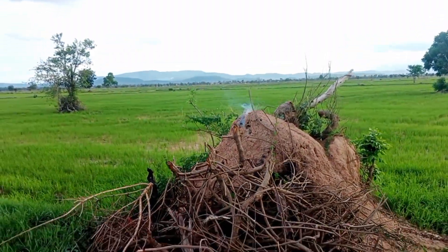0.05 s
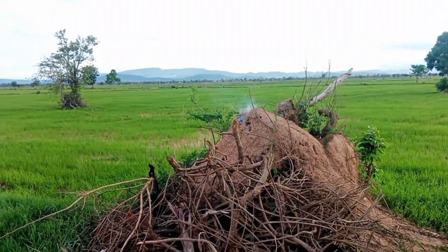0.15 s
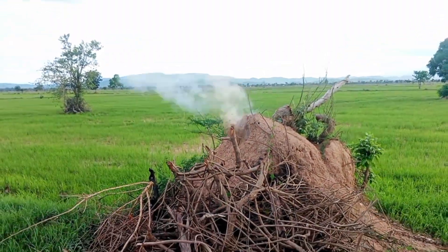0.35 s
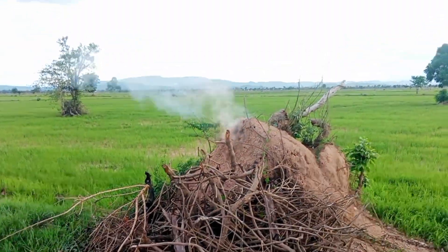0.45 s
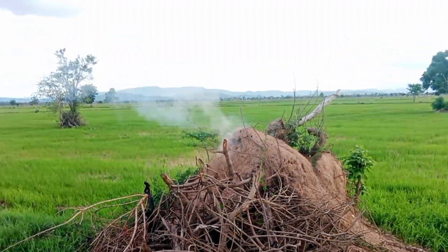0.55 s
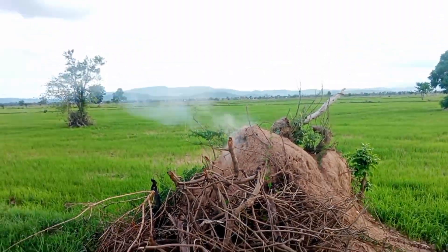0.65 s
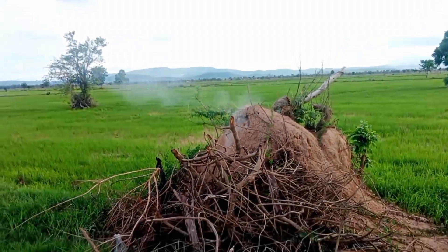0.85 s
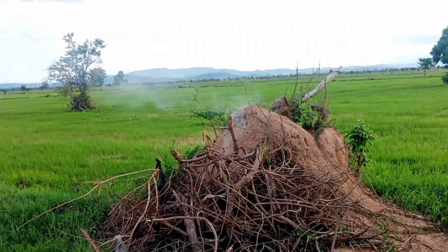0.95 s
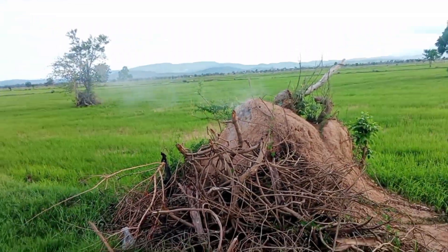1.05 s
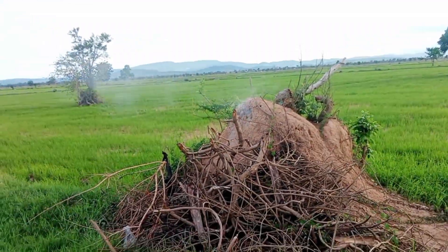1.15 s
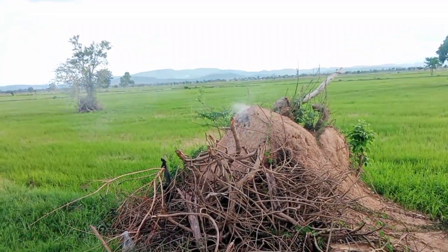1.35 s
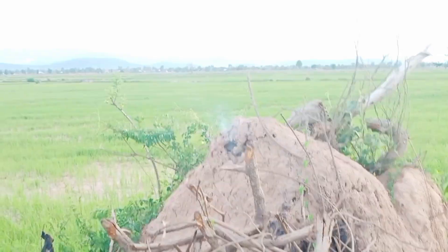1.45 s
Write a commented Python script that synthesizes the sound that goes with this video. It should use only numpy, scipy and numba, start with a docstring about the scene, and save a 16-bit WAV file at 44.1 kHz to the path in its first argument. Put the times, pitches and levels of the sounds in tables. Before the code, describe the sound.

A firecracker bangs inside an earth mound, overloading the microphone, then low echoes roll across open fields

```python
"""Open fields, an earth mound, a dull microphone: a firecracker bursts in the mound and overloads it.
The blast is a noisy ring through tanh; scattered echoes follow as a short roar of filtered random clicks.
Far low echoes roll in waves, made of band-passed noise, clicks and single bell-shaped bursts.
Soil patters as fine clicks and clods as noisy knocks, before the blast and after it; a few bright ticks.
Faint field noise and hiss lie beneath; the rumble stops short near the end."""
import sys
import numpy as np
from scipy import signal
from scipy.fft import rfft, irfft
from scipy.io import wavfile
from scipy.ndimage import uniform_filter1d
from numba import njit

SR = 44100
rng = np.random.default_rng(int(sys.argv[2]) if len(sys.argv) > 2 else 0)


def wrap_up_sound(samples):
    """Save the sound to the file named by the first command line argument, as 16-bit audio."""
    columns = np.atleast_2d(samples).T
    # keep every value between -1 and 1, then stretch to whole-number steps
    tamed = np.clip(columns, -1, 1)
    steps = np.round(tamed * 32767).astype(np.int16)
    wavfile.write(sys.argv[1], SR, steps)


def invert_db(level):
    """Linear amplitude ratio for a level in decibels (20 dB per decade), elementwise."""
    return 10 ** (np.asarray(level, dtype=float) / 20)


N = 66150
T = np.arange(N) / SR  # s
RUMBLE_STOP_S = 1.4495
DULL_HZ = 2500  # low-pass for the field noise and the fading roar


def noise():
    """White noise, rms 1."""
    return rng.standard_normal(N)


def unit(x):
    """Scales to rms 1."""
    return x / np.sqrt(np.mean(x ** 2))


def butter(order, hz, kind="low"):
    """Butterworth filter sections."""
    return signal.butter(order, hz, kind, fs=SR, output="sos")


def colour(x, table):
    """Causal minimum-phase filter with the given (f/Hz, level/dB) shape, made through the cepstrum."""
    hz, db = np.array(table).T
    grid = np.maximum(np.fft.rfftfreq(4096, 1 / SR), 1)
    log_gain = np.interp(np.log(grid), np.log(hz), db) * np.log(10) / 20
    cepstrum = irfft(log_gain)
    # fold the negative times onto the positive ones
    cepstrum[1:2048] *= 2
    cepstrum[2049:] = 0
    impulse = irfft(np.exp(rfft(cepstrum)))
    return signal.fftconvolve(x, impulse)[:len(x)]


@njit
def svf(x, hz, width):
    """State-variable band-pass whose centre moves; width is relative to the centre."""
    y, band, low = np.empty(len(x)), 0., 0.
    for i in range(len(x)):
        g = np.tan(np.pi * hz[i] / SR)
        v = (band + g * (x[i] - low)) / (1 + g * (g + width))
        band, low, y[i] = 2 * v - band, low + 2 * g * v, width * v
    return y


def curve(rows):
    """Gain from (t/s, level/dB) rows, silent outside them."""
    s, db = np.array(rows).T[:2]
    return invert_db(np.interp(T, s, db, left=-140, right=-140))


def smooth(gain):
    """Rounds the corners of a gain curve."""
    return uniform_filter1d(gain, size=200)


def gate(start, length):
    """Opens in 0.4 ms from the start, shuts in 0.6 ms after the length."""
    opening = np.clip((T - start) / 4e-4, 0, 1)
    closing = np.clip((start + length - T) / 6e-4 + 1, 0, 1)
    return opening * closing


def decay(start, t60):
    """Exponential fall from 1 at the start, 60 dB in t60 seconds."""
    return (T >= start) * invert_db(-60 * np.maximum(T - start, 0) / t60)


def walk(per_s):
    """Random levels joined by straight lines."""
    return np.interp(T * per_s, np.arange(256), rng.standard_normal(256))


def grains(per_s, spread_db, table):
    """Random clicks of uneven size through one colour; rms 1."""
    hit, size, sign = rng.random(N), rng.exponential(size=N), noise()
    share = np.clip((per_s / SR - hit) * SR / 50 + .5, 0, 1)  # soft threshold picks the samples that click
    clicks = share * sign * invert_db(spread_db * np.minimum(size, 4))
    return unit(colour(clicks, table))


def patchy(x):
    """Low, middle and high grains swell on their own."""
    low, mid = (signal.sosfiltfilt(butter(4, hz), x) for hz in (1300, 2800))
    return sum(invert_db(3.5 * walk(25)) * part for part in (low, mid - low, x - mid))


def burst(s, db, hz, length):
    """A few cycles under a bell-shaped envelope centred on s."""
    bell = np.exp(-((T - s) / length) ** 2)
    return invert_db(db) * bell * np.sin(2 * np.pi * (hz * (T - s) + rng.random()))


# Far rumble rolling over the fields: t/s, level/dB (of its narrow part), f/Hz (wandering centre)
RUMBLE_WAVES = [(0.0, -32.5, 222.8), (0.104, -45.5, 166), (0.202, -52, 286.5), (0.243, -56.5, 263.4),
                (0.274, -42.5, 225.4), (0.335, -44.5, 298.4), (0.584, -35, 172.2), (0.624, -47, 198.1),
                (0.786, -35, 227.3), (0.872, -48.5, 196.4), (1.201, -48, 201.4), (1.37, -62, 126.9),
                (1.449, -62, 137.8)]
# Colour of its broad part: f/Hz, level/dB (relative)
RUMBLE_COLOUR = [(25, -38), (45, -25.5), (75, -4), (120, -3.5), (280, -5.5), (438, -13.5), (719, -26.5),
                 (1200, -58.5), (2000, -110)]


def rumble():
    """Low far echoes in waves: noise band-passed twice around a wandering centre, over broad clicks."""
    width, top_hz, broad_db = 0.55, 650, 2.5  # width relative to the centre; broad over narrow part
    rows = np.array(RUMBLE_WAVES + [(RUMBLE_STOP_S, *RUMBLE_WAVES[-1][1:])])
    broad = grains(3000, 1, RUMBLE_COLOUR)
    hz = np.interp(T, rows[:, 0], rows[:, 2])
    narrow = unit(svf(noise(), hz, width))
    narrow = unit(svf(narrow, hz, 2 * width) / np.sqrt(hz))  # evens the power as the bandwidth moves
    narrow = signal.sosfilt(butter(4, top_hz), narrow)
    return curve(rows) * (narrow + invert_db(broad_db) * broad)


# Colour of the open country at the microphone: f/Hz, level/dB (relative)
FIELD_COLOUR = [(30, -7.5), (80, 4.5), (300, 12.5), (800, -10.5), (1200, -2), (1900, 5.5), (2500, -8.5),
                (3500, -3), (4300, -14), (5000, -45.5)]


def field():
    """Faint country noise, dull until the rumble stops, and white microphone hiss."""
    field_db, hiss_db = -75, -94
    air = unit(colour(noise(), FIELD_COLOUR))
    dull = signal.sosfilt(butter(4, DULL_HZ), air)
    return invert_db(field_db) * np.where(T < RUMBLE_STOP_S, dull, air) + invert_db(hiss_db) * noise()


# Fine soil pattering, two spells: t/s, level/dB (before the uneven swelling)
PATTER_SPELLS = [
    [(0, -92.5), (.06, -65.5), (.078, -52.5), (.11, -63), (.16, -66.5), (.19, -100)],
    [(.58, -76), (.65, -58), (.675, -49), (.76, -51.5), (.83, -51), (.91, -54), (.945, -57.5),
     (1.04, -57.5), (1.19, -58.5), (1.25, -66.5), (1.29, -63), (1.4, -81.5), (1.449, -80)],
]
# Colour of the fine soil: f/Hz, level/dB (relative)
PATTER_COLOUR = [(350, -38.5), (700, 7), (1000, 8), (1500, 4), (2000, 3), (2700, -9.5), (3100, -25.5),
                 (3600, -13), (4200, -22), (4800, -48), (7000, -61)]


def patter():
    """Fine soil as a bed of dense clicks, swelling unevenly in three bands."""
    bed = grains(14000, -2.5, PATTER_COLOUR)
    return smooth(sum(curve(rows) for rows in PATTER_SPELLS)) * patchy(bed)


# Strongest low echoes: t/s, level/dB (peak of the bell), f/Hz
BOOM_ECHOES = [(0.071, -29, 182), (0.566, -21, 187), (0.711, -21.5, 263), (0.719, -22, 163.6),
               (.772, -25.5, 220), (0.788, -21.5, 231), (0.836, -27.5, 235), (0.969, -32, 233),
               (1.065, -30, 257), (1.089, -31.5, 130), (1.183, -35, 210), (1.216, -40.5, 90),
               (1.322, -45, 77.6), (1.435, -42.5, 91.8)]


def booms():
    """Single low echoes that stand out of the rumble, each a bell one cycle to either side."""
    return sum(burst(s, db, hz, 1 / hz) for s, db, hz in BOOM_ECHOES) * gate(0, RUMBLE_STOP_S)


# Clods landing: t/s, level/dB (peak), f/Hz
CLOD_KNOCKS = [(0.0773, -40, 1630), (0.665, -35, 1200), (0.671, -46, 1710), (.83, -35, 650),
               (.846, -39, 1540), (.865, -41, 1990), (0.9184, -47, 1130), (0.963, -41.5, 1910),
               (0.997, -36, 1780), (1.007, -48.5, 1700), (1.1139, -51, 1790), (1.165, -54, 1120)]


def clods():
    """Clods as short knocks: a decaying kick of noise through a band around each pitch."""
    t60_s, rise_s, width = 0.014, 0.0011, .42  # width: band edges relative to the pitch
    out = np.zeros(N)
    t = T[:2048]
    for s, db, hz in CLOD_KNOCKS:
        kick = rng.standard_normal(len(t)) * invert_db(-60 * t / t60_s) * (1 - np.exp(-t / rise_s))
        knock = signal.sosfilt(butter(4, [hz / (1 + width), hz * (1 + width)], "band"), kick)
        out[int(s * SR):][:len(t)] += invert_db(db) * knock / np.abs(knock).max()
    return out


BLAST_S, BLAST_HOLD_S = .2385, .0064  # start and length of the overloaded ring


def overloaded_ring():
    """A rough ring that drops about an octave, bent by tanh as the microphone overloads."""
    first_hz, later_hz, turn_s = 1150, 580, .003
    drive, rough, width = 1.6, .6, 1.  # rough: share of noise; width relative to its centre
    early = gate(0, BLAST_S + turn_s)
    hz = later_hz + (first_hz - later_hz) * early
    ring = np.sin(2 * np.pi * np.cumsum(hz * (T > BLAST_S)) / SR)
    grit = rough * (.5 + early) * unit(svf(noise(), 1.6 * hz, width))
    bent = np.tanh(drive * (ring + grit))
    return signal.sosfilt(butter(6, 2300), bent * gate(BLAST_S, BLAST_HOLD_S))


# Colour of slaps and tail: f/Hz, level/dB (relative)
BLAST_COLOUR = [(24, -111), (40, -2.5), (257, -5.5), (520, 9), (927, 1), (1990, -1), (2680, -17),
                (3410, -26.5), (4100, -66.5), (7500, -120)]
# Near echoes of the blast: t/s, level/dB (against the blast), length/s
SLAP_ECHOES = [(0.2459, -22.5, .003), (0.252, -12.5, 0.0064)]


def slaps_and_tail():
    """Near echoes and a short decaying tail, all of one coloured noise."""
    tail_db, tail_t60_s = -16.5, 0.077  # against the blast
    end = BLAST_S + BLAST_HOLD_S
    shape = invert_db(tail_db) * gate(end, 1) * decay(end, tail_t60_s)
    shape = shape + sum(invert_db(db) * gate(s, length) for s, db, length in SLAP_ECHOES)
    source = noise()
    return colour(source * shape, BLAST_COLOUR) / colour(source, BLAST_COLOUR).std()


def crack():
    """Bright noise held through the blast over a quick decay."""
    table = [(2500, -41.5), (4200, -19.0), (6000, 6.0), (9000, -12), (15500, -5.5)]
    bright = unit(colour(noise(), table))
    return invert_db(-42.5) * bright * (gate(BLAST_S, BLAST_HOLD_S) + 0.21 * decay(BLAST_S, 0.0082))


def thump():
    """The mound answers with a low bell-shaped burst."""
    hz, db, length_s = 97, -28, 0.011
    return burst(BLAST_S + length_s, db, hz, length_s) * gate(BLAST_S, 1)


def blast():
    """The firecracker: overloaded ring, two slaps and a tail, bright crack, low thump."""
    return invert_db(-3.6) * (overloaded_ring() + slaps_and_tail()) + crack() + thump()


# Roar of scattered echoes: t/s, level/dB
ROAR_SWELLS = [(.258, -29), (.266, -28), (.292, -27.5), (.309, -21.5), (.325, -26), (.336, -23.5),
               (.378, -23), (.387, -23), (.41, -25.5), (.427, -27.5), (.44, -42.5), (.462, -44.5),
               (.49, -38), (.57, -44), (.64, -51.5)]
# Colour of the roar's body: f/Hz, level/dB (relative)
ROAR_COLOUR = [(40, -30.5), (150, -26), (239, -10.5), (531, -0.5), (689, -1.5), (1040, -2.5), (2260, -14),
               (3410, -33.5), (4430, -48), (7500, -120)]
# Colour of its airy top: f/Hz, level/dB (relative)
ROAR_AIR_COLOUR = [(3000, -24.5), (3800, 10), (4500, 4.5), (5000, -8), (7000, 0.5), (8400, -3), (9200, -22),
                   (15500, -26)]
# Colour of the closing snap: f/Hz, level/dB (relative)
SNAP_COLOUR = [(1200, -10), (2500, 0), (4500, -12), (5200, -30), (15500, -34)]


def roar():
    """Scattered echoes as dense clicks that swell and darken, then drop away with a snap."""
    end_s, snap_s, snap_db = .428, .005, -44.5
    air_db, air_t60_s = -32.5, .6  # air against the body, at the blast
    air = unit(colour(noise(), ROAR_AIR_COLOUR)) * decay(BLAST_S, air_t60_s)
    air = air * (1 - .8 * (T > end_s))
    snap = invert_db(snap_db) * gate(end_s - snap_s, snap_s) * unit(colour(noise(), SNAP_COLOUR))
    bright = grains(6000, 1, ROAR_COLOUR) + invert_db(air_db) * air
    dull = signal.sosfiltfilt(butter(4, DULL_HZ), bright)
    fade = np.interp(T, [.52, .55], [0, 1])  # the fading roar loses its top
    swell = smooth(curve(ROAR_SWELLS)) * invert_db(1 * walk(130))  # 1 dB of unevenness
    return swell * (bright + fade * (dull - bright)) + snap


# Faint bright ticks: t/s, level/dB
TICK_CLICKS = [(.788, -60.5), (.876, -57)]


def ticks():
    """Soft bright clicks: coloured noise under bell-shaped envelopes."""
    shape = sum(invert_db(db) * np.exp(-((T - s) / 0.0021) ** 2) for s, db in TICK_CLICKS)
    table = [(1500, -7), (2600, 3), (4200, 15), (4900, -38.5), (12000, -24)]
    return shape * unit(colour(noise(), table))


def scene():
    """Sums all sources at the microphone, one channel."""
    return (blast() + roar() + rumble() + booms() + patter() + clods() + ticks() + field())[None]


def top_cut(x):
    """Nothing passes above the cut-off."""
    return signal.sosfilt(signal.butter(12, 16500, fs=SR, output="sos"), x)


def record(dry):
    """The microphone cuts the deepest bass; the sound drops out for 5 ms where the rumble stops."""
    mix = signal.sosfilt(butter(3, 45, "high"), dry)
    mix = mix * (1 - gate(RUMBLE_STOP_S, .005))
    return top_cut(mix)


dry = scene()
out = record(dry)
wrap_up_sound(out)
```